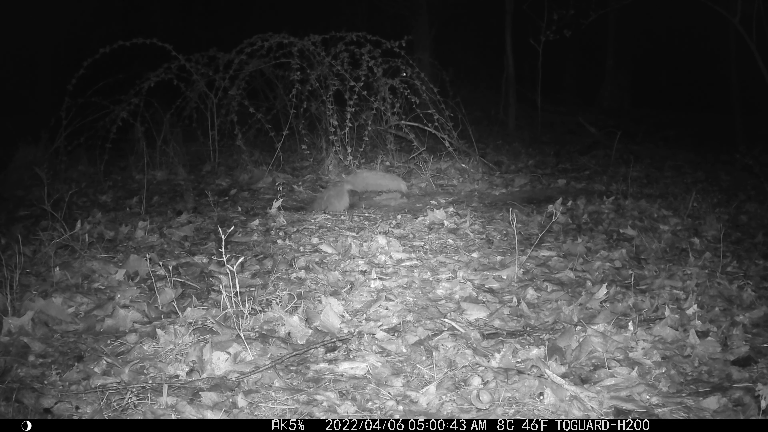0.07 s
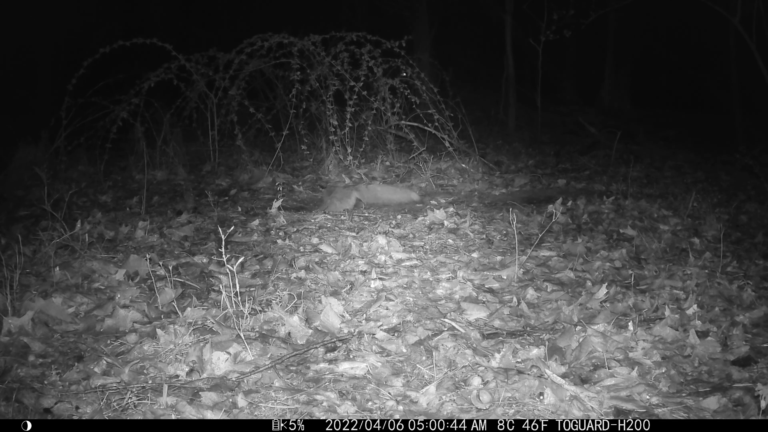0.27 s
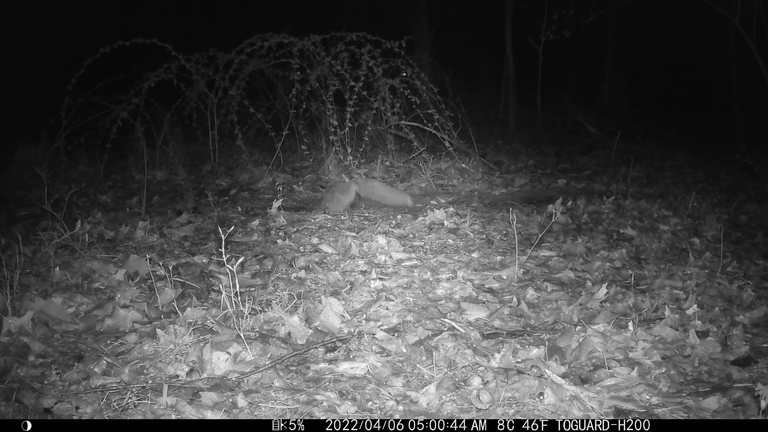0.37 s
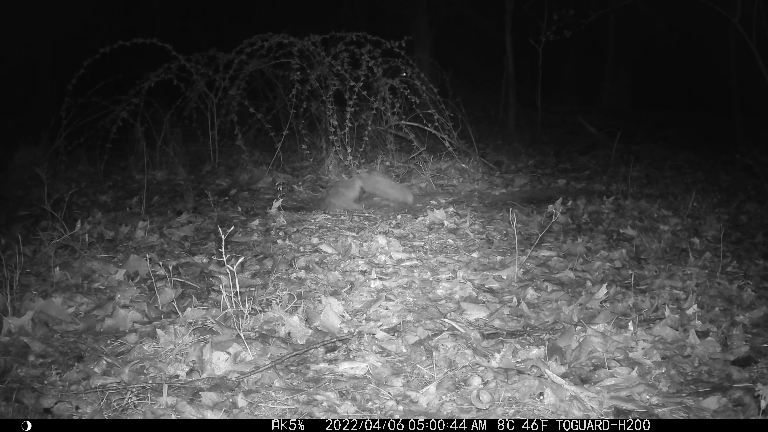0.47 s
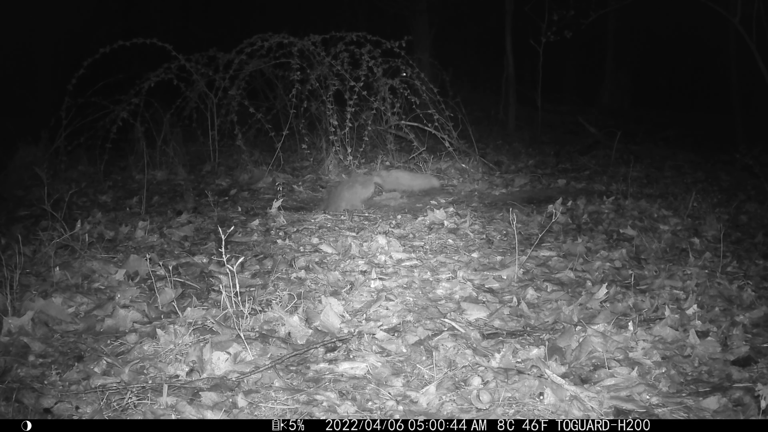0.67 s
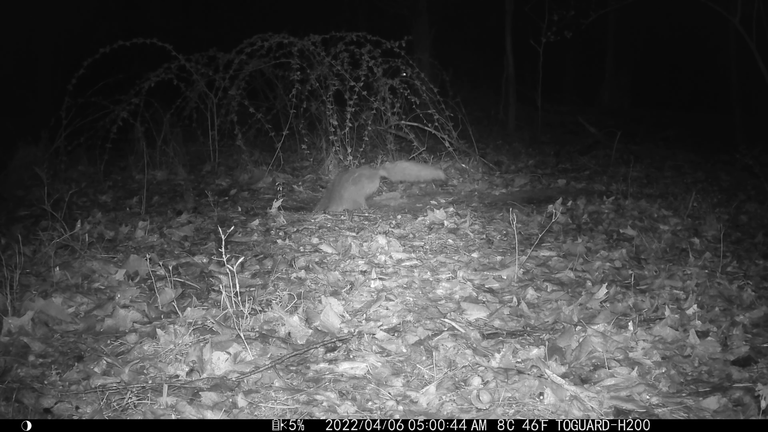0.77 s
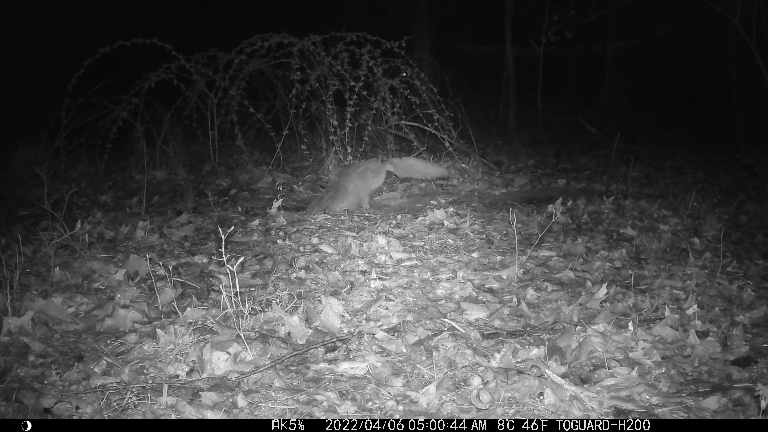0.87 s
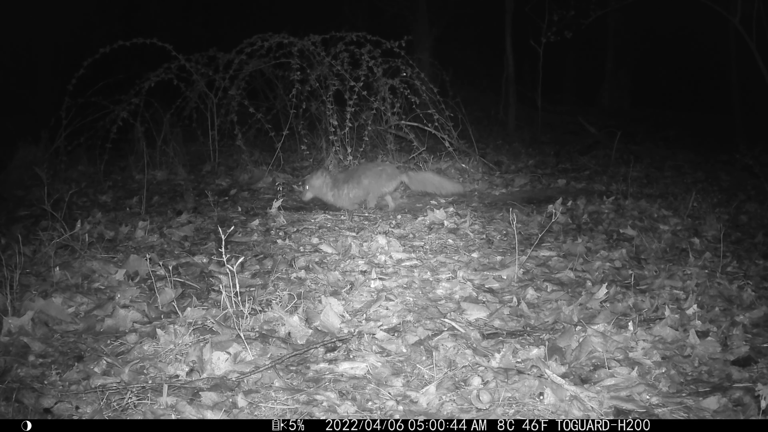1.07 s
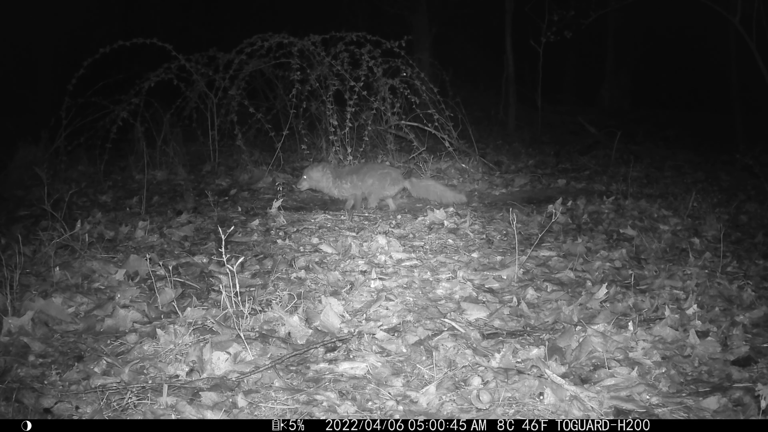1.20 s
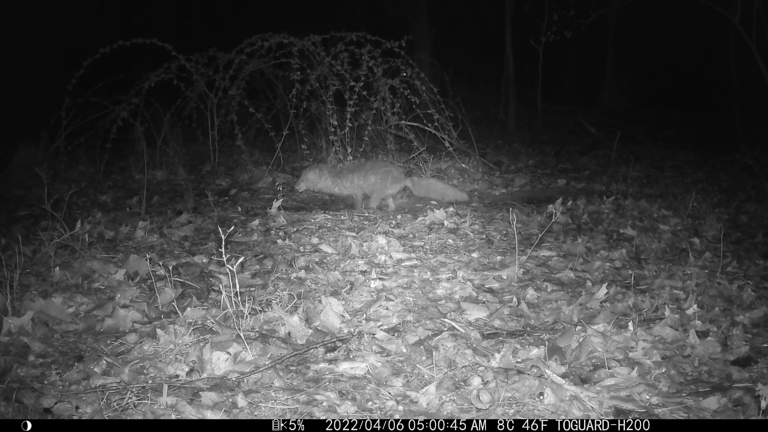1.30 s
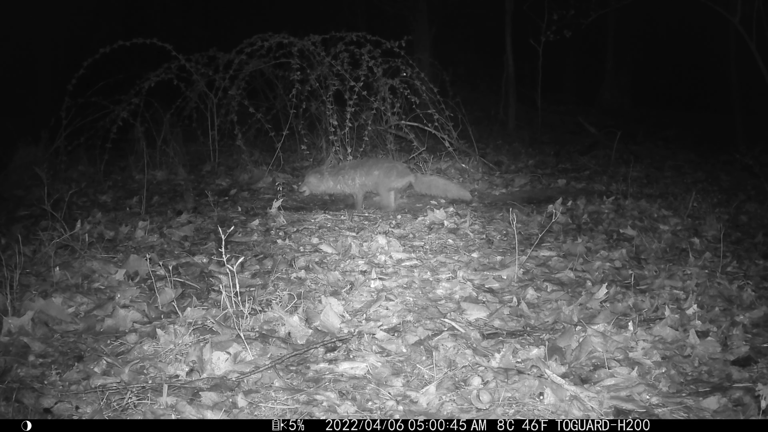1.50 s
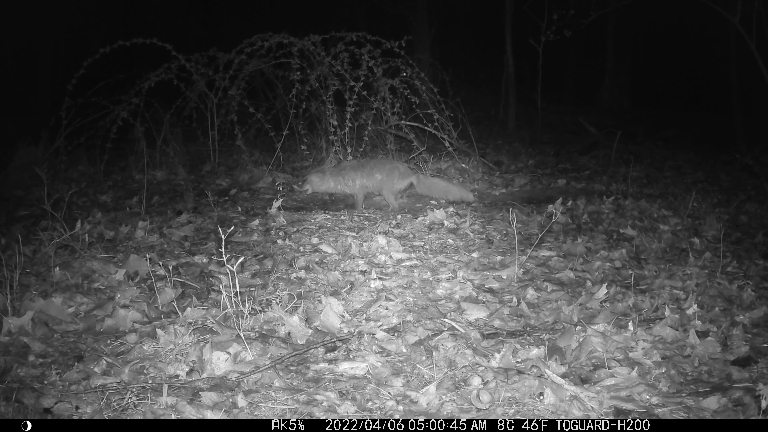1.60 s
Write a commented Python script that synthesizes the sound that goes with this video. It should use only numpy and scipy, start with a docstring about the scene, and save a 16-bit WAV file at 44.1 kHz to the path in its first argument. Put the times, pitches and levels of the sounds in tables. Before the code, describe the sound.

Soft, low paw thumps and crackling leaf litter build to one heavier flurry as a fox pounces in a wood at night. Four quick, quiet, slightly raspy whines follow, over steady hiss and an uneven rumble.

```python
"""A fox pounces and scuffles in dry leaves in a wood at night, then gives four short, thin whines.
Its paws land as dull, low thumps with a brighter slap on the hard hits. Each whine is a nearly
pure tone that turns raspy where the voice breaks. Leaves and twigs snap in tiny bursts of noise
over the fine crackle of the litter; a low rumble and a steady hiss lie under it all."""
import sys
import numpy as np
from scipy.fft import rfft, irfft, next_fast_len
from scipy.io import wavfile
from scipy.ndimage import map_coordinates

SR = 44100
rng = np.random.default_rng(int(sys.argv[2]) if len(sys.argv) > 2 else 0)


def wrap_up_sound(samples):
    """Save the sound to the file named by the first command line argument, as 16-bit audio."""
    columns = np.atleast_2d(samples).T
    # keep every value between -1 and 1, then stretch to whole-number steps
    tamed = np.clip(columns, -1, 1)
    steps = np.round(tamed * 32767).astype(np.int16)
    wavfile.write(sys.argv[1], SR, steps)


N = 72765
T = np.arange(N) / SR

# paws hitting the ground: start_s, peak_db, pitch_hz, slap_db (against the thump)
PAW_HITS = [(.05, -38, 92, -19), (.139, -40.5, 113, -36), (0.233, -36.5, 96, -37), (0.246, -37, 135, -16.5),
            (0.278, -41.5, 130, -39), (.39, -39.5, 173, -12), (.455, -37, 185, -3.5),
            (.48, -32.5, 170, -32), (0.545, -22, 170, -9), (.554, -25, 161, -7.5),
            (0.565, -25.5, 200, -2.5), (.575, -26, 209, -19), (.586, -34.5, 161, -3), (0.592, -29, 210, -5),
            (.601, -28.5, 238, -10), (0.679, -31, 162, -16), (0.685, -30.5, 115, -34),
            (.736, -36.5, 168, -11), (0.748, -32, 162, -27), (0.772, -31.5, 195, -32),
            (.811, -45, 157, -32), (0.85, -43.5, 179, -22), (0.915, -45, 170, -3.5), (0.957, -37, 93, -32),
            (1.031, -35, 155, -33), (1.063, -37, 131, -38), (1.088, -46.5, 159, -17),
            (1.158, -46, 133, -20), (1.252, -46, 84, -8), (1.54, -42, 45, -39)]
# one contour per whine: time_s, pitch_hz, level_db, octave_level_db, roughness (0-1)
WHINE_CONTOURS = [
    [(1.138, 828, -71, -94, 0), (1.165, 803, -69.5, -85, 0), (1.181, 775, -59.5, -55, 0.11),
     (1.192, 808, -56.5, -62.5, .03), (1.201, 900, -83, -78, 0)],
    [(1.286, 860, -64, -86, .05), (1.304, 865, -49, -82, .02), (1.312, 925, -58, -80, .05),
     (1.319, 892, -49, -68, .02), (1.331, 882, -44.5, -63, .02), (1.341, 830, -46.5, -58.5, .02),
     (1.349, 717, -68, -70, 0.1), (1.366, 775, -56, -74, .25), (1.38, 900, -83, -85, 0.3)],
    [(1.461, 810, -66, -78, .05), (1.47, 853, -50, -84, 0.1), (1.483, 916, -53.5, -74, 0.22),
     (1.488, 890, -58, -66, 0.78), (1.495, 790, -54, -83, 0.88), (1.501, 874, -44, -72, 0.04),
     (1.513, 905, -45.5, -65, .04), (1.524, 882, -45.5, -66, .05), (1.529, 870, -56, -68, .55),
     (1.545, 800, -61, -64, .45), (1.56, 740, -70, -70, .4), (1.577, 767, -65.5, -71, 0.3),
     (1.587, 796, -66, -75, 0.3)],
    [(1.594, 798, -85.5, -78, 0), (1.61, 814, -52.5, -78, 0.14), (1.619, 753, -71.5, -75, 0.04),
     (1.633, 821, -52, -64, .08), (1.641, 695, -59, -63, 0), (1.65, 770, -48, -62, 0)],
]
# the throat's colour on the rasp: frequency_hz, gain_db
THROAT_EQ = [(350, -32), (700, 5), (1000, -17), (1400, -4), (1800, -12), (2200, -26), (2800, -15),
             (4500, -38)]
# leaves and twigs breaking: start_s, peak_db, pitch_hz, half_width_octaves
TWIG_SNAPS = [(.059, -46.5, 764, 0.63), (0.0594, -29.5, 4950, 0.34), (0.2435, -42, 1440, 0.63),
              (.2437, -41, 8100, 0.83), (.254, -48, 5000, 2.9), (0.404, -42, 2200, 1.4),
              (0.4688, -47.5, 3850, 0.78), (0.5348, -41, 1790, 0.72), (0.558, -38, 6450, 0.81),
              (.578, -42, 5000, 1.7), (.59, -42, 3530, 3.8), (0.642, -48.5, 4600, .8),
              (0.7927, -48, 4030, 0.33), (0.826, -46, 1240, 0.43), (.914, -50.5, 1850, 0.5),
              (0.9624, -46, 1800, 1.2), (0.961, -41.5, 6200, 0.25), (0.991, -51, 3770, 0.21),
              (1.0325, -44.5, 1300, 0.39), (1.0323, -39, 5400, 0.46), (1.11, -40.5, 6360, 0.35),
              (1.2412, -43.5, 1580, 2.7), (1.256, -47.5, 2240, 2.6), (1.2747, -42, 2540, 1.6),
              (1.444, -46, 3630, 3), (1.575, -47.5, 8960, 0.32), (1.627, -46.5, 4500, 1.1)]
# swell of the leaf litter: time_s, level_db
RUSTLE_ENVELOPE = [(0, -66.5), (.3, -63.5), (.48, -63), (.56, -57.5), (.65, -57), (.73, -61.5), (1, -62),
                   (1.2, -65), (1.65, -64)]
# colour of the leaf litter: frequency_hz, gain_db
RUSTLE_EQ = [(200, 23), (700, 5.5), (2000, -1.5), (4500, -2), (8000, -4), (12000, -13), (16000, -21.5)]
# crackle bands, from large leaves to small: pitch_hz
LEAF_PITCHES = [900, 1800, 3000, 4500, 6500, 9000, 13000]
# swell of the rumble: time_s, level_db (before its trim)
RUMBLE_ENVELOPE = [(0, -41), (.06, -46.5), (.11, -47), (.17, -53), (.2, -46.5), (.25, -36.5), (.32, -45),
                   (.44, -44.5), (.49, -37.5), (.52, -32), (.565, -27), (.62, -35.5), (.72, -47.5),
                   (.76, -39), (.82, -41), (.97, -40.5), (1.1, -45.5), (1.19, -51), (1.26, -44.5),
                   (1.3, -62.5), (1.41, -50), (1.53, -47.5), (1.6, -51.5), (1.65, -62)]
# colour of the rumble: frequency_hz, gain_db
RUMBLE_EQ = [(12, -3.5), (30, 2.5), (90, -1), (160, -12), (260, -18), (400, -25.5), (700, -40.5),
             (1500, -96)]
# colour of the hiss: frequency_hz, gain_db
HISS_EQ = [(100, 20), (400, 14), (900, 7.5), (1600, 6.5), (2800, 2), (4200, 6.5), (6500, -6.5), (8200, 1),
           (10000, -12), (15500, -9)]

THIRD_DB, FOURTH_DB = [-28, -21.5, -30, -35], -38.5  # harmonics against the fundamental; third per whine
RASP_DB, SUBTONE_DB = -4.5, [-14.5, -4.5]  # rough voice: breath; tones at 1/2 and 3/2 of the pitch


def paw_thumps(slap_hz=438, slap_lag_s=0.0015):
    """Each paw gives the soft ground a low push; hard contacts add a brighter slap."""
    track = np.zeros(N)
    for start_s, peak_db, pitch_hz, slap_db in PAW_HITS:
        add(track, start_s, peak_db, ground_push(pitch_hz))
        add(track, start_s + slap_lag_s, peak_db + slap_db, ground_push(slap_hz))
    return track


def ground_push(pitch_hz, attack_cycles=0.49):
    """One soft push that dies within two cycles."""
    t = np.arange(SR // 10) / SR
    age = t * pitch_hz / attack_cycles
    envelope = (age * np.exp(-age)) ** 2
    return -envelope * np.sin(2 * np.pi * pitch_hz * t)


def whine(contour, third_db, fade_s=0.0021, jitter=0.0059, jitter_per_s=300, flutter_per_s=260):
    """A thin tone with weak overtones; where the voice breaks it flutters, rasps and gains subtones."""
    pitch_hz, level_db, octave_db, roughness = curves(contour)
    inside_s = np.minimum(T - contour[0][0], contour[-1][0] - T)
    gate = np.clip(inside_s / fade_s + 1, 0, 1)
    phase = 2 * np.pi * np.cumsum(pitch_hz * (1 + jitter * wobble(jitter_per_s))) / SR
    partials = [(1, amp(level_db)), (2, amp(octave_db)),
                (3, amp(level_db + third_db)), (4, amp(level_db + FOURTH_DB))]
    partials += [(k + 0.5, roughness * amp(level_db + db)) for k, db in enumerate(SUBTONE_DB)]
    breath = coloured(rng.standard_normal(N), THROAT_EQ)
    pulses = (1 + np.cos(phase)) / 2  # one puff of breath per cycle
    voice = np.sqrt(roughness) * amp(level_db + RASP_DB) * breath * pulses
    steady = np.sqrt(1 - roughness ** 2)
    for ratio, gain in partials:
        flutter = roughness * (wobble(flutter_per_s) + 1j * wobble(flutter_per_s)) / np.sqrt(2)
        voice += gain * np.imag((steady + flutter) * np.exp(1j * ratio * phase))
    return np.sqrt(2) * gate * voice


def twig_snaps(attack_s=0.0012, t60_s=0.0063, steepness=2.47, damping_hz=11900):
    """Dry leaves and twigs break with a very short crack, each in its own band."""
    track = np.zeros(N)
    t = np.arange(2048) / SR
    hz = np.fft.rfftfreq(len(t), 1 / SR) + 1
    envelope = (1 - np.exp(-t / attack_s)) * amp(-60 * t / t60_s)
    damping = 1 + (hz / damping_hz) ** 2  # the leaf litter dulls the top end
    for start_s, peak_db, pitch_hz, octaves in TWIG_SNAPS:
        band = 1 / (1 + np.abs(np.log2(hz / pitch_hz) / octaves) ** steepness)
        crack = irfft(band / damping * np.exp(2j * np.pi * rng.random(len(hz))))
        add(track, start_s, peak_db, crack * envelope)
    return track


def leaf_rustle(crackles_per_s=7000, spread_db=3.5, width_octaves=0.58):
    """The leaf litter gives dense, tiny crackles in several bands, strongest as the fox lands."""
    level_db, = curves(RUSTLE_ENVELOPE)
    crackles = np.zeros(N)
    for pitch_hz in LEAF_PITCHES:
        sizes = amp(spread_db * np.minimum(rng.exponential(size=N), 5))
        signs = rng.choice([-1, 1], N)
        hits = rng.random(N) < crackles_per_s / len(LEAF_PITCHES) / SR
        crackles += filtered(sizes * signs * hits,
                             lambda hz: np.exp(-(np.log2((hz + 1) / pitch_hz) / width_octaves) ** 2 / 2))
    return amp(level_db) * coloured(crackles, RUSTLE_EQ)


def rumble(trim_db=-2.5):
    """A low, uneven rumble that swells with the scuffle."""
    level_db, = curves(RUMBLE_ENVELOPE)
    return amp(level_db + trim_db) * coloured(rng.standard_normal(N), RUMBLE_EQ)


def hiss(level_db=-64):
    """A steady bed of hiss."""
    return amp(level_db) * coloured(rng.standard_normal(N), HISS_EQ)


def amp(db):
    """Decibels to gain."""
    return 10 ** (np.asarray(db) / 20)


def wobble(knots_per_s):
    """A smooth random modulation curve."""
    return map_coordinates(rng.standard_normal(4096), [T * knots_per_s], mode="wrap")


def curves(rows):
    """One automation curve for each column after the time."""
    time_s, *columns = np.transpose(rows)
    return [np.interp(T, time_s, column) for column in columns]


def filtered(x, response):
    """Filter x with a gain given as a function of frequency."""
    size = next_fast_len(N + SR // 2)
    return irfft(rfft(x, size) * response(np.fft.rfftfreq(size, 1 / SR)), size)[:N]


def coloured(x, eq):
    """Shape x with an EQ curve and scale it to rms 1."""
    points_hz, gain_db = np.transpose(eq)
    shaped = filtered(x, lambda hz: amp(np.interp(np.log(hz + 1), np.log(points_hz), gain_db)))
    return shaped / np.sqrt(np.mean(shaped ** 2) + 1e-20)


def add(track, start_s, peak_db, sound):
    """Drop a sound onto the track at the given peak level."""
    part = track[max(round(start_s * SR), 0):][:len(sound)]
    part += amp(peak_db) * sound[:len(part)] / np.abs(sound).max()


def scene():
    """The fox and the leaves up front, rumble and hiss behind, in mono."""
    whines = sum(whine(contour, third_db) for contour, third_db in zip(WHINE_CONTOURS, THIRD_DB))
    return (paw_thumps() + whines + twig_snaps() + leaf_rustle() + rumble() + hiss())[None]


def record(dry, cutoff_hz=15900):
    """A brick-wall low-pass takes off the very top."""
    return filtered(dry[0], lambda hz: hz < cutoff_hz)[None]


dry = scene()
out = record(dry)
wrap_up_sound(out)
```